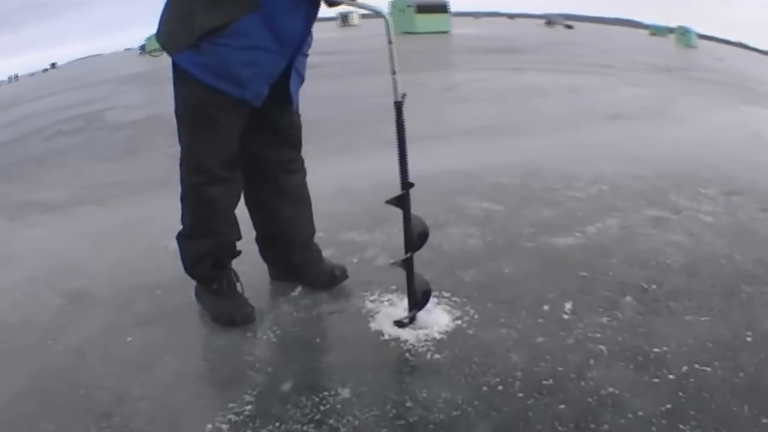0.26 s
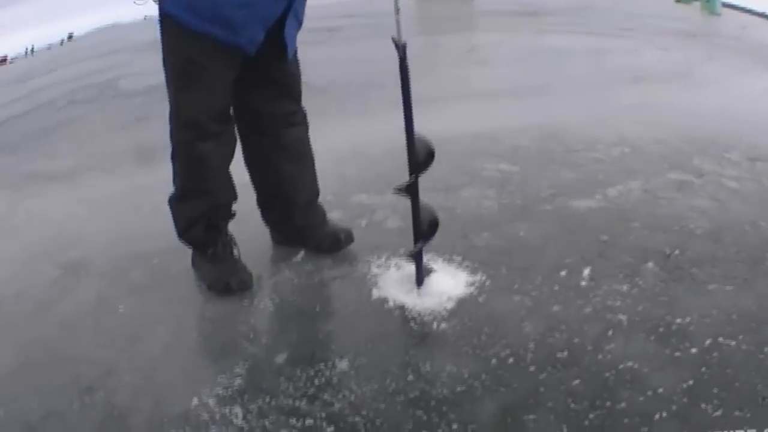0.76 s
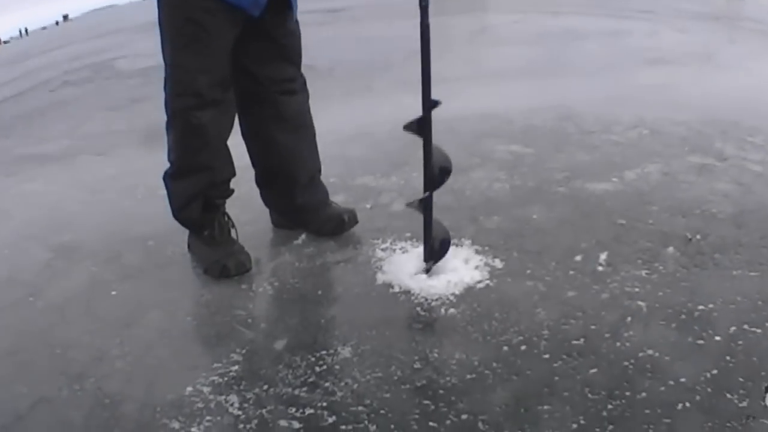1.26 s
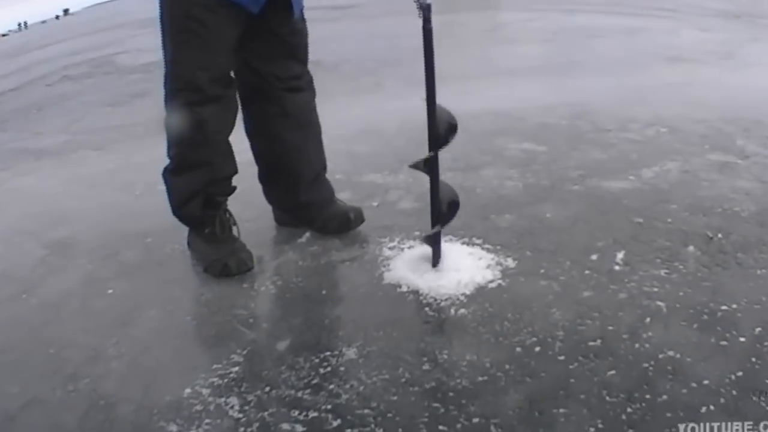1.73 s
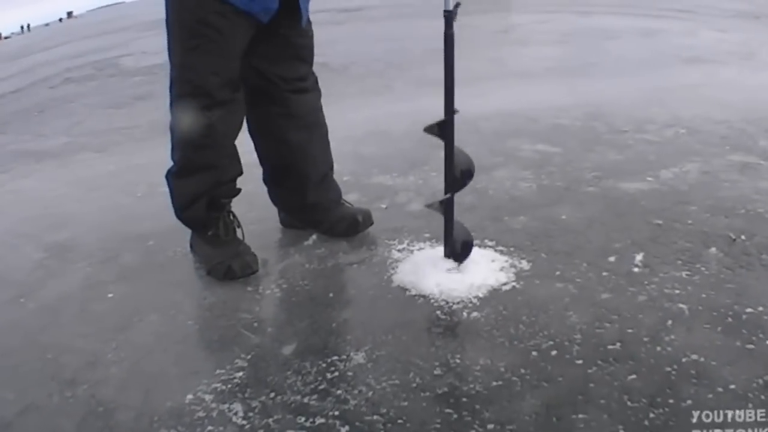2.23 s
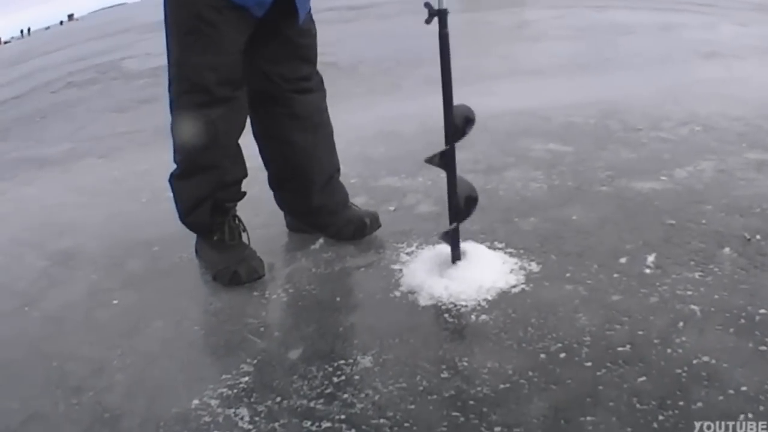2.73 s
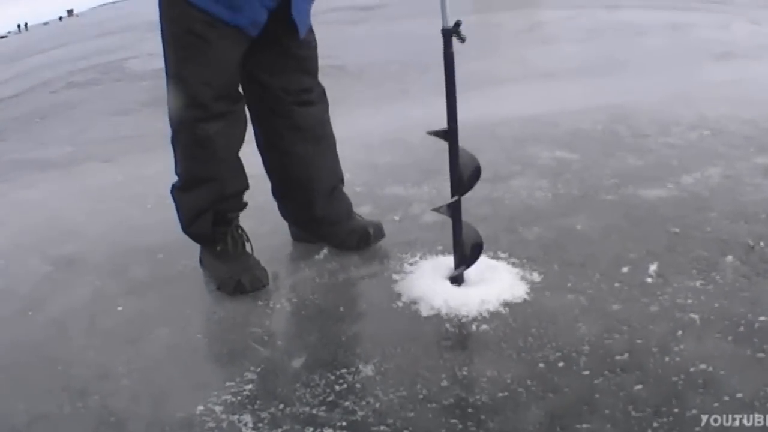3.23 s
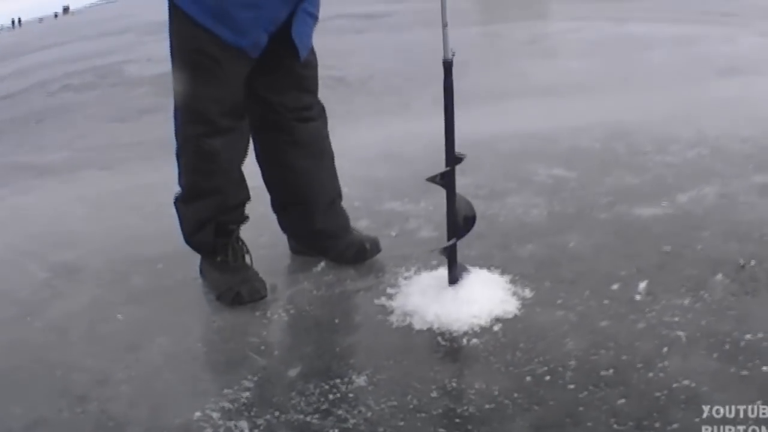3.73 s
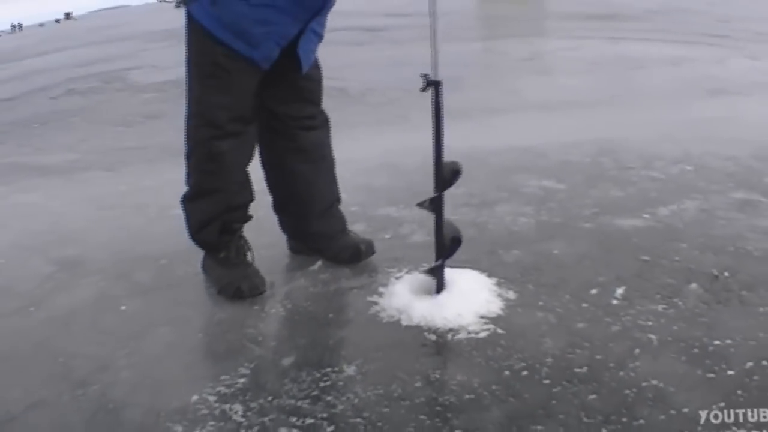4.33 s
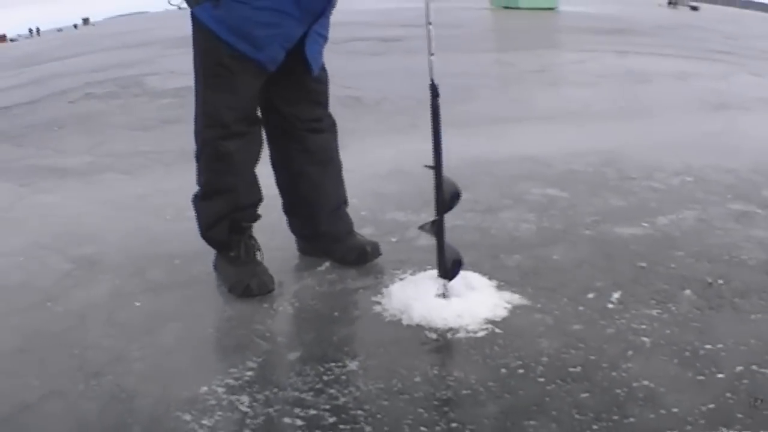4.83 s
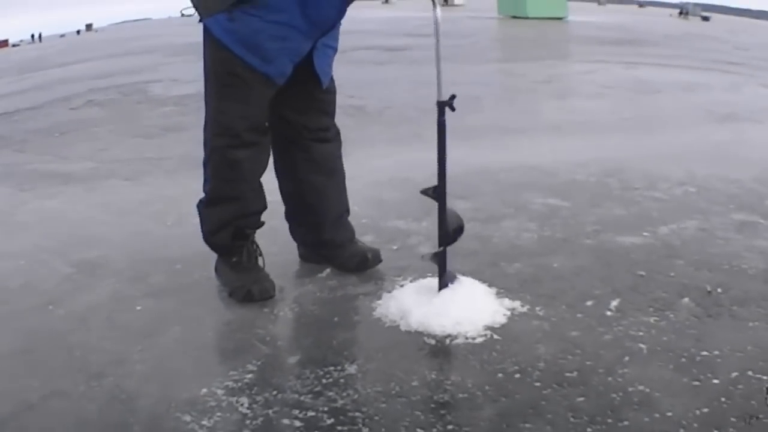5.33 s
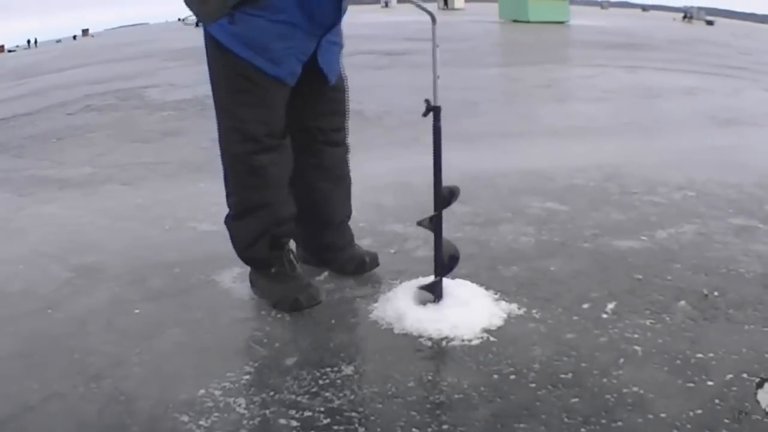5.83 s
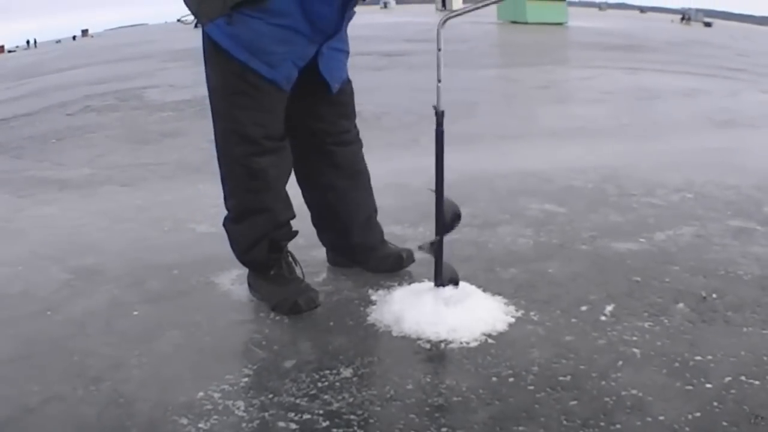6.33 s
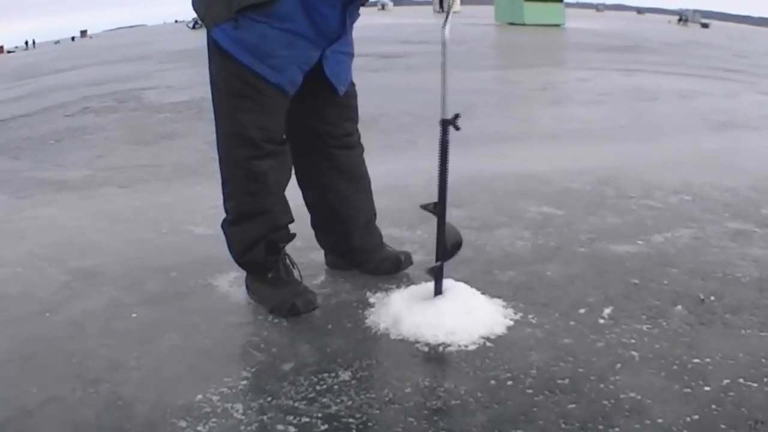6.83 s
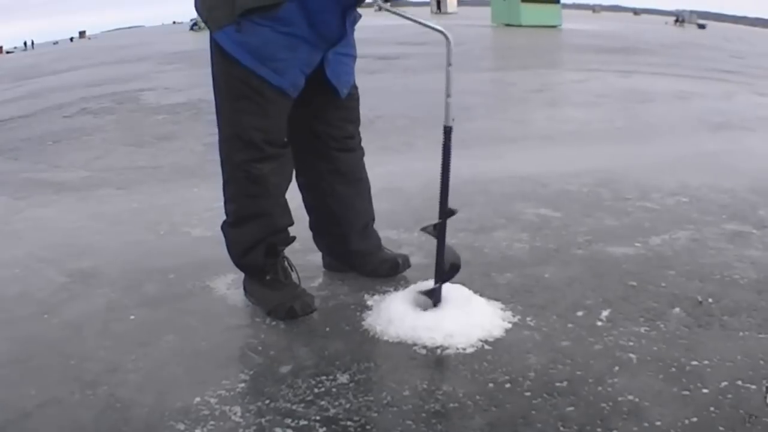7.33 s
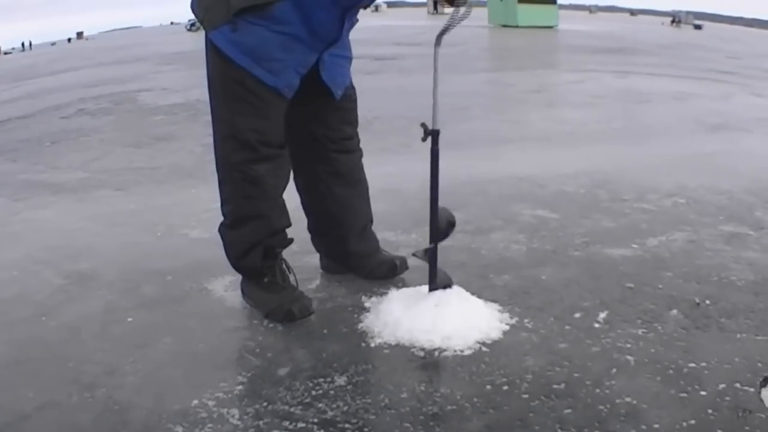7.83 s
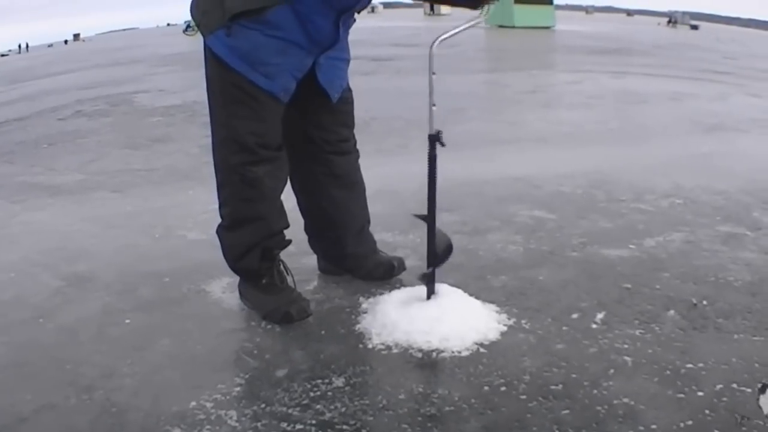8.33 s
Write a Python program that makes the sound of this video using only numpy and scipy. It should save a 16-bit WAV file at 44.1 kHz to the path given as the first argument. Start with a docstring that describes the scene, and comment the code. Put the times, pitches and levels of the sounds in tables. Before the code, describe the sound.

Continuous coarse ice grinding from a hand-turned drill, already under way at the start and unbroken to the end. Rapid stick-slip chatter, brief hesitations, harder bites and brittle clicks ride over hissing fine shavings. Hollow metallic resonances come and go, becoming lower and more muffled as loose chips bury the blades. A dull grind and very faint wind lie beneath. Dry open air, heard fairly close.

```python
"""An uneven grinding of ice and a soft puff of air are heard first: a hand auger is cranked into lake ice.
Its two blades chip by stick and slip, each slip a burst of tiny random fractures, with stalls, bites and ticks.
The chipping drives moving resonances of the steel spiral and the hole, in swells that follow the crank.
A dull grind of the ice sheet, two low knocks and faint wind on the microphones lie beneath."""
import sys
import numpy as np
from scipy import signal
from scipy.fft import rfft, irfft, next_fast_len
from scipy.io import wavfile
from scipy.ndimage import uniform_filter1d, map_coordinates

SR = 44100
rng = np.random.default_rng(int(sys.argv[2]) if len(sys.argv) > 2 else 0)


def master(y):
    """Save y as 16-bit WAV."""
    cut = np.clip(np.atleast_2d(y).T, -1, 1)
    pcm = np.round(cut * 32767)  # scale
    wavfile.write(sys.argv[1], SR, pcm.astype(np.int16))


N = 378020

# All half lengths are those of a Gaussian bump, from its centre to 1/e of its height.
# moments at which the crank passes its dead point, on the whole ever closer together: time [s]
DEAD_POINTS = [-.2, .72, 1.6, 2.49, 3.3, 4.08, 4.8, 5.51, 6.25, 6.97, 7.66, 8.33, 9]
# how closely loose chips and the wall of the hole enclose the blades: (time [s], share [0 open, 1 buried])
BURIAL = [(0, 0.42), (1.8, 0.079), (3.2, 0.012), (3.8, 0.23), (4.4, .75), (8.57, 0.94)]
# the blades hang for a moment: (time [s], half length [s], level [dB])
STALLS = [(0.038, 0.018, -4.5), (0.135, 0.019, -3), (.29, 0.042, -1.5), (.377, 0.0037, -6),
          (.6, 0.037, -3.5), (.777, 0.011, -3.5), (1.164, 0.0041, -7), (1.595, 0.076, -3),
          (1.594, 0.0042, -6), (1.781, .005, -8), (1.93, .008, -4.5), (2.033, 0.016, -11.5),
          (2.08, 0.016, -2.5), (2.096, 0.0055, -7), (2.147, 0.014, -3), (2.29, 0.037, -3),
          (2.489, 0.015, -8), (2.56, .016, -5.5), (2.68, .006, -3.5), (2.89, 0.032, -1.5),
          (3.27, 0.023, -2.5), (3.343, 0.0051, -12.5), (3.53, 0.035, -2), (3.558, 0.0089, -3),
          (3.69, 0.033, -1), (3.748, 0.012, -3.5), (3.761, 0.005, -7), (3.97, 0.031, -1),
          (4.248, 0.024, -3), (4.35, 0.0072, -5), (4.797, 0.027, -5), (4.98, 0.027, -2.5),
          (5.508, 0.023, -3.5), (5.556, .006, -4), (6.239, 0.0034, -9.5), (6.25, 0.0038, -11),
          (6.643, 0.029, -4), (6.957, 0.024, -7.5), (6.973, 0.0094, -20), (7.005, 0.026, -8),
          (7.115, 0.019, -2), (7.365, 0.012, -6.5), (7.625, 0.015, -3.5), (8.095, 0.03, -4.5),
          (8.318, 0.011, -4.5), (8.345, 0.023, -2), (8.365, 0.0041, -8), (8.513, 0.013, -4.5)]
# the blades dig in harder: (time [s], level [dB])
SURGES = [(.1, 2), (.24, 4.5), (.89, 1), (1.38, 2), (1.88, 3), (2.26, 2.5), (2.39, 1.5), (3.11, 1),
          (3.37, 2), (3.44, 2), (3.63, 4), (4.005, 1.5), (4.735, 2), (5.3, 1.5), (6.86, 2.5), (7.055, 2.5),
          (7.27, 1.5), (7.49, 1.5), (7.555, 1.5), (8.175, 3.5)]
# the slips stand more clearly apart: (time [s], half length [s], added share of bursts [1])
JUDDERS = [(.13, 0.13, 0.23), (1.238, 0.11, 0.41), (2.045, 0.15, 0.36), (2.67, 0.076, 0.22),
           (4.12, .11, 0.31), (4.86, 0.046, 0.17), (5.08, 0.052, .25), (5.55, 0.077, 0.41),
           (7.68, 0.037, 0.53), (8.33, 0.077, 0.2)]

# Drives have a first row for open blades and a second for buried ones:
# (mean level [dB], crank swing [dB], its peak [turns past the dead point], blade swing [dB], its peak [turns])
SCRAPE_DRIVE = [(-23, 1, 0.91, 0.5, 0.31), (-23.5, 0.94, 0.49, -0.06, 0.44)]
FIZZ_DRIVE = [(-27, 0.5, 0.89, 0.43, 0.32), (-27, 0.55, 0.62, 0.4, 0.34)]
# the same columns, one row for each resonance, with the blades open and then buried
RINGS_OPEN = [(-40.5, 0.99, 0.93, 1.5, 0.29), (-42.5, 1.8, 0.77, 2.9, 0.2), (-38.5, 2.5, 0.42, 2.9, 0.23),
              (-44.5, 1.2, 0.9, 0.3, 1), (-25, 0.75, 0.44, 3.3, 0.21), (-28.5, 2.7, 0.13, 0.95, 0.34),
              (-32, 1.2, 0.63, 1.7, 0.5), (-34, 1, 0.67, 1, 0.3), (-32, 1, 0.8, 1, 0.3),
              (-44, 1, 0.8, 1, 0.3)]
RINGS_BURIED = [(-29, 3.1, 0.74, 1.2, 0.3), (-31.5, 4.3, 0.38, 1.7, 0.41), (-31, .5, 0.8, 1.3, 0.17),
                (-30.5, 0.39, 1, 3.4, 0.25), (-36.5, 0.99, 0.27, 1.4, 0.34), (-22.5, 1.3, 0.28, 1.2, 0.48),
                (-36, 3.4, 0.41, 1, 0.05), (-44, 1, 0.4, 1, 0.3), (-30, 1, 1, 1, 0.3),
                (-46, 1, 0.8, 1, 0.3)]

# relative spectra of the scrape, the fizz of shavings and the dull grind: (frequency [Hz], level [dB])
SCRAPE_SPECTRUM = [(450, -47), (700, -15.5), (1150, -5.5), (1500, -2.5), (2300, -7), (2550, -3),
                   (3000, -3.5), (3600, -2.5), (4100, -5), (5200, -7.5), (6000, -7), (7500, -20),
                   (11000, -46)]
FIZZ_SPECTRUM = [(4000, -45), (6000, -11.5), (6800, -5), (7900, -3), (9500, -3.5), (11000, -6.5),
                 (12500, -9), (14000, -15), (15000, -26), (15600, -38)]
DULL_SPECTRUM = [(50, -60), (90, -33), (115, -28), (140, -7.5), (190, -5), (240, 1.5), (370, 0), (450, 9.5),
                 (600, 10), (750, 16.5), (1100, -51)]
# relative spectra of ticks, wind and jolts, and low cut of the auger's sound: (frequency [Hz], level [dB])
TICK_SPECTRUM = [(150, -50), (600, -23), (1400, 2), (4000, 11), (9000, -3), (15000, -13)]
WIND_SPECTRUM = [(15, -8), (30, -2), (80, 0), (200, -26)]
JOLT_SPECTRUM = [(20, -3), (70, 0), (200, -20), (600, -60)]
LOW_CUT = [(45, -28), (100, -0.5)]

# resonances of spiral and hole: (frequency [Hz], nominal width [Hz], relative level [dB], share of the bend [1])
RINGS = [(796.4, 112, -0.36, 0.17), (939, 101, -0.95, 0.53), (1087, 200, -2.5, 0.27),
         (1410, 118, 5.5, 0.96), (1737, 98, -4.5, 0.066), (1987, 266, -4.5, 0.17), (2984, 70, -5.5, 0.39),
         (1590, 100, -2, 0.2), (3430, 140, -13, 0.2), (4350, 130, -21, 0.2)]
# the turning spiral bends the resonances, by this path of the strongest: (time [s], frequency [Hz])
BEND = [(0, 1367), (.6, 1423), (1.0, 1305), (1.2, 1396), (1.45, 1464), (2.15, 1410), (2.42, 1467),
        (3.2, 1443), (4.1, 1425), (4.55, 1450), (5.25, 1427), (6.5, 1425), (6.85, 1387), (7.5, 1440),
        (7.7, 1350), (7.95, 1450), (8.25, 1380), (8.57, 1340)]
# the nearest resonance sings out or falls back: (time [s], half length [s], frequency near it [Hz], level [dB])
SINGS = [(0.112, 0.13, 1420, 11.5), (0.28, 0.11, 2970, 8.5), (.33, .1, 4350, 10), (.28, 0.1, 960, 3.5),
         (.54, 0.16, 1730, 5), (.93, .08, 1730, 0), (1.14, 0.13, 2970, 8), (1.123, 0.17, 1420, 11.5),
         (1.352, 0.16, 1420, 12), (1.2, 0.14, 1730, 2), (1.393, 0.051, 960, 11), (1.798, 0.13, 1730, 4.5),
         (1.853, 0.19, 960, 17), (1.79, .1, 1090, 8), (1.88, .06, 2970, 8), (2.24, .06, 1730, 3.5),
         (2.28, .18, 4350, 8), (2.33, .1, 1590, 9), (2.36, 0.32, 1420, 12), (2.367, 0.069, 960, 14),
         (2.785, 0.22, 960, 17.5), (2.697, .16, 1090, 7), (2.684, 0.064, 1730, 3.5),
         (2.854, 0.052, 1730, -12), (2.95, .2, 4350, 8), (3.042, 0.15, 1730, 7.5), (3.16, 0.27, 1420, 14),
         (3.15, .08, 3430, 20), (3.18, 0.12, 790, 9.5), (3.427, 0.082, 790, 7), (3.62, 0.082, 790, 10),
         (3.58, 0.12, 960, 10), (3.542, 0.29, 1090, 9.5), (3.89, 0.13, 1730, 10), (3.95, 0.13, 790, 8.5),
         (4.08, 0.14, 1420, 9), (4.35, .13, 1590, 13), (4.4, 0.31, 790, 4), (4.435, 0.24, 960, 7),
         (4.506, 0.035, 1420, 10), (4.704, 0.083, 1420, -5), (4.755, 0.15, 2015, 2), (4.9, 0.05, 1420, 3),
         (5.09, .07, 2015, 5), (5.27, 0.21, 960, 5), (5.357, 0.1, 1420, 3.5), (5.374, .08, 790, 4),
         (5.677, 0.047, 1420, 3), (5.826, 0.18, 2015, 3.5), (6.165, 0.083, 1420, 7), (6.16, 0.11, 790, 2.5),
         (6.15, 0.097, 960, 4), (6.32, .15, 3430, -10), (6.483, 0.18, 1420, 6.5), (6.422, 0.17, 2015, 2),
         (6.522, 0.088, 960, 3), (6.85, .07, 960, 0), (7.26, 0.048, 2015, 5.5), (7.27, 0.063, 2970, 7),
         (7.6, 0.11, 1420, 6.5), (7.55, 0.053, 3430, 14), (7.79, .08, 790, -7), (7.96, 0.073, 1420, 10),
         (8.484, 0.091, 1420, -2)]
# the ringing is kept thin below its lowest resonance: (frequency [Hz], level [dB])
RING_LOW_CUT = [(200, -18), (560, -8), (700, -2.5)]
# the ice sheet's dull share of the grinding: (time [s], level [dB])
SHEET = [(0, -33.5), (.22, -45), (.27, -45), (1.15, -40.5), (1.6, -43), (3.0, -43), (4.0, -41),
         (6.15, -40.5), (6.6, -43), (7.5, -41.5), (8.57, -38)]
# stronger or weaker puffs of air: (time [s], half length [s], level [dB])
GUSTS = [(.03, .15, 24), (1.1, .22, -15), (4.07, 0.1, 29), (7.68, .1, 14)]

# larger chips break off: (time [s], relative level [dB], ring against that level [dB], extra treble [dB])
BITES = [(0.098, 3, -1, -8), (0.19, 2.5, 9.5, 0), (0.2, 1, 6, -4), (0.229, -2, 7, -3),
         (0.251, 4, -11, -2.5), (.748, 6, -2, -2), (.998, -15, -12, -8), (1.184, -6, 10, 2),
         (1.208, -5, 0, 2), (1.221, -4, -6, 7), (1.282, 0, 0, -5), (1.309, -2, 0, -7), (1.494, 6, -16, -1),
         (1.756, 2, 4, 7), (1.999, -2, 6, -3), (2.07, -1, 2, -6), (2.087, 0, -8, 2), (2.102, 3, 1, -3),
         (2.5, -1, -9, 0), (2.539, -1, -5, 5), (2.644, 5, -3, -2), (2.657, 0, -9, 0), (2.922, 4, -23, -3),
         (3.347, 1, 5, -7), (3.664, 3, 0, 3), (4.025, -4, 13, 2), (4.056, 2, -3, 4), (4.074, -10, -3, 0),
         (4.105, -8, 7.5, -3), (4.176, -3, 7, 6), (4.393, 2.5, 9, 3.5), (4.518, 0, 9, -2),
         (4.735, -2, -6, 2), (4.82, 5, 1, -1), (4.833, 0, 3, -3), (4.849, 0, 5, -14), (5.03, -10, 11, -3),
         (5.093, 2.5, 7, 0), (5.458, -0.5, -9, 6.5), (5.572, 4, -6, 1), (5.795, -1.5, 14, -3),
         (6.271, 0, 8, 1), (6.376, -4.5, 13, 4), (6.447, 1, -3, 0), (6.874, -2.5, 16, 0),
         (6.9805, 4.5, -3, 3.5), (7.639, 4, 1, -3), (7.658, 2, 3, -6), (7.685, -4.5, 17, -2),
         (7.737, -0.5, 11.5, 1), (7.844, 0, 8, -2), (8.032, 4, 3, 1), (8.057, 5.5, -8, 1),
         (8.385, 2.5, 13, 2), (8.398, 1, 7, -2)]
# how a big chip excites the resonances: (frequency [Hz], level [dB])
BITE_TONE = [(200, -22), (560, -8), (790, -4), (1400, -3), (3000, -10)]
# dull knocks: (time [s], relative level [dB])
KNOCKS = [(0.176, -27), (3.234, -43)]

# likeness of left and right ahead of the spiral's reflections: (frequency [Hz], correlation [1])
ALIKE = [(60, .3), (120, 0.71), (240, 0.77), (500, 0.9), (950, .96), (1900, 0.92), (3800, 0.61),
         (7500, 0.62), (15000, 0.61)]
# balance of left against right: (frequency [Hz], level difference [dB])
LEAN = [(60, -1), (92, 1.5), (140, 4), (210, 1.5), (330, 0), (500, 0.5), (770, 0.5), (1170, 1), (1790, 0),
        (2740, 1), (4190, -1), (6410, 1.5), (9810, 6), (15000, 4.5)]
# colour of steel and hole: (frequency [Hz], width [Hz], level when open [dB], level when buried [dB])
COLOUR = [(520, 140, 4, -8), (800, 112, -5, 1.5), (900, 140, -0.5, 2), (1036, 152, 3, -15),
          (1230, 120, -6.5, 4), (2232, 72, 7, 6.5), (2290, 220, 1.5, 0.5), (3430, 104, -4.5, 4),
          (3910, 190, -2.5, -3), (4350, 140, 4.5, -1), (5200, 61, 6, 5), (5950, 360, -2, -6.5),
          (6720, 84, 7.5, 3.5), (7170, 90, 5, 6)]
# long waves bend around the spiral, short ones bounce off it: (frequency [Hz], share of the reflections [1])
BOUNCE = [(700, 0.2), (2400, 0.89)]

SLIPS_PER_S, SLIPS_BURIED_PER_S = 83, -11  # mean slip rate with open blades; its change when buried
BURST_SHARE = 0.52  # usual share of the cutting power that comes in bursts
# just past the dead point [turns] slips come slower [share] and more distinct [added share of bursts]
LABOUR_TURNS, LABOUR_SLOWS, LABOUR_BURSTS = 0.0634, 0.1038, 0.013
SURGE_S = 0.02  # half length of a surge
HANG_S, HANG_DB = 0.005, -3.5  # quiet loading just before a big chip: half length and lead, depth
TICKS_PER_S, TICK_DB, TICK_SPREAD_DB = 36, -7.5, 9  # mean rate, loudest relative level, range below it
WIND_DB, GUST_DB = -87, 6  # level without puffs, strength of its random variation
TOP_HZ = 15650  # upper band limit


def amp(db):
    """Logarithmic level: decibels become a gain."""
    return 10 ** (np.asarray(db) / 20)


def unit(x):
    """Normalization: x is brought to an rms of 1."""
    return x / np.sqrt(np.mean(x ** 2) + 1e-20)


def along(points, hz):
    """Interpolation of (frequency, value) points on a logarithmic frequency axis."""
    f, v = np.transpose(points)
    return np.interp(np.log(hz + 1), np.log(f + 1), v)


def curves(rows):
    """Linear interpolation in time: one value per sample for each column after the time."""
    s, *cols = np.transpose(rows)
    return [np.interp(np.arange(N) / SR, s, c) for c in cols]


def wobble(rate):
    """Slow random modulation: a smooth curve through rate random knots a second."""
    return map_coordinates(rng.standard_normal(4096), [np.arange(N) * rate / SR], mode="wrap")


def spells(rows):
    """Superposition of Gaussian bumps, one for each (time, half length, height)."""
    total = np.zeros(N)
    for s, half, height in rows:
        start, end = max(int((s - 4 * half) * SR), 0), min(int((s + 4 * half) * SR), N)
        i = np.arange(start, end)
        total[i] += height * np.exp(-np.square((i / SR - s) / half))
    return total


def filtered(x, response):
    """Linear filtering: the spectrum of x times a response of frequency."""
    m = next_fast_len(N + SR // 4, True)
    return irfft(rfft(x, m) * response(np.fft.rfftfreq(m, 1 / SR)), m)[..., :N]


def shaped(x, spectrum):
    """Spectral weighting: x coloured by (frequency, level) points."""
    return filtered(x, lambda f: amp(along(spectrum, f)))


def mode(f, hz, width):
    """Damped resonance: the causal response of a single mode."""
    return 1j * f * width / (hz * hz - f * f + 1j * f * width)


def gliding(x, hz, width):
    """Heterodyne resonance: shifting x by a moving carrier lets a double pole follow the centre."""
    carrier = np.exp(2j * np.pi * np.cumsum(hz) / SR)
    pole = np.exp(-np.pi * width / SR)
    return (signal.lfilter([1], np.poly([pole, pole]), x / carrier) * carrier).real


def steadied(ring):
    """Energy levelling: slow changes of power are evened out by the mid signal, fast flutter stays."""
    power = np.abs(uniform_filter1d(ring[0] ** 2, size=3500))
    return ring / np.sqrt(power + 1e-20)


def fractures(per_second, spread_db):
    """Brittle fracture as random impulses of unequal size, in a mid and a side signal."""
    present = rng.random(N) < per_second / SR
    size = amp(spread_db * rng.standard_normal(N))
    return unit(rng.standard_normal((2, N)) * present * size)


def burst(rise, decay):
    """Impulsive release: an envelope that rises fast to 1 and decays exponentially (both in s)."""
    t = np.arange(SR // 6) / SR
    shape = (1 - np.exp(-t / rise)) * np.exp(-t / decay)
    return shape / shape.max()


def strikes(times, sizes, shape):
    """Superposition of impulses: one scaled copy of an envelope at each time."""
    at = np.clip(np.round(times * SR).astype(int), 0, N)
    marks = np.bincount(at, sizes, N + 1)[:N]
    return np.abs(signal.fftconvolve(marks, shape)[:N])


def crank():
    """Rotation and burial: turns of the crank so far, and how closely the blades are enclosed."""
    turn = np.interp(np.arange(N) / SR, DEAD_POINTS, np.arange(len(DEAD_POINTS)))
    return turn, np.clip(curves(BURIAL)[0], 0, 1)


def swell(drive):
    """Periodic forcing: gain swings once a turn for the crank and twice for the two blades."""
    turn, buried = crank()
    levels = []
    for db, crank_db, crank_at, blade_db, blade_at in drive:
        crank_swing = crank_db * np.cos(2 * np.pi * (turn - crank_at))
        blade_swing = blade_db * np.cos(2 * np.pi * 2 * (turn - blade_at))
        levels.append(db + crank_swing + blade_swing)
    open_db, buried_db = levels
    return amp(open_db + (buried_db - open_db) * buried)


def grip_db():
    """Friction grip: the blades hold less in a stall or just before a big chip, more in a surge."""
    hangs = [(s - HANG_S, HANG_S, HANG_DB) for s, *_ in BITES]
    surges = [(s, SURGE_S, db) for s, db in SURGES]
    return spells(STALLS + hangs + surges)


def slipping(scatter, size_db, slip_decay, uneven_db, push_db):
    """Stick and slip: the blades load up, slip and load again, giving the strength of the chipping."""
    turn, buried = crank()
    labour = np.cos(2 * np.pi * (turn - LABOUR_TURNS))
    rate = (SLIPS_PER_S + SLIPS_BURIED_PER_S * buried) * (1 - LABOUR_SLOWS * labour)
    share = np.clip(BURST_SHARE + LABOUR_BURSTS * labour + spells(JUDDERS), 0, .95)
    slips = np.flatnonzero(np.diff(np.floor(np.cumsum(rate) / SR)))
    chance = rng.standard_normal((2048, 2))[:len(slips)]
    times = slips / SR + scatter * chance[:, 0] / rate[slips]
    power = strikes(times, amp(size_db * chance[:, 1]) ** 2, burst(.0006, slip_decay))
    # the crank supplies the energy, the slips only bunch it
    power /= uniform_filter1d(power, size=4410) + 1e-9
    level_db = grip_db() + uneven_db * wobble(45) + push_db * wobble(14)
    return np.sqrt(1 - share + share * power) * amp(level_db)


def shaving(slips):
    """Fracture noise: the bright scrape of the blades and the fizz of fine shavings."""
    scrape_flutter = amp(1.03 * wobble(25))
    scrape = unit(shaped(fractures(30000, spread_db=1.3) * slips * scrape_flutter, SCRAPE_SPECTRUM))
    fizz_flutter = amp(0.61 * wobble(110) + 0.98 * wobble(6.1))
    fizz = unit(shaped(fractures(24000, spread_db=1.0) * slips * fizz_flutter, FIZZ_SPECTRUM))
    return swell(SCRAPE_DRIVE) * scrape + swell(FIZZ_DRIVE) * fizz


def grinding(slips):
    """Sheet radiation: the ice sheet answers the chipping with a dull grind."""
    cracks = fractures(9000, spread_db=1.5) * slips
    return amp(curves(SHEET)[0]) * unit(shaped(cracks, DULL_SPECTRUM))


def ringing(slips, broaden, waver_db, touchy):
    """Forced resonance: the chipping drives each mode of spiral and hole, which weakens with the grip."""
    bend = curves(BEND)[0] / RINGS[3][0] - 1  # the fourth resonance is the strongest
    drive = slips * amp(touchy * grip_db())
    grip = unit(np.sqrt(np.abs(uniform_filter1d(drive ** 2, size=3500))))
    centres = np.transpose(RINGS)[0]
    rings = np.zeros((2, N))
    for k, (hz, width, db, follows) in enumerate(RINGS):
        own_sings = [(s, half, gain) for s, half, near, gain in SINGS
                     if np.argmin(abs(centres - near)) == k]
        cracks = fractures(9000, spread_db=3.0) * drive
        ring = steadied(gliding(cracks, hz * (1 + follows * bend), broaden * width)) * grip
        level = amp(db + spells(own_sings) + waver_db * wobble(17))
        rings += swell([RINGS_OPEN[k], RINGS_BURIED[k]]) * level * ring
    return shaped(rings, RING_LOW_CUT)


def ticking(slips):
    """Random impulses: brittle splinters click off, louder as the slip is stronger, up to a limit."""
    present = rng.random(N) < TICKS_PER_S / SR
    size = amp(TICK_DB - TICK_SPREAD_DB * rng.random(N)) * np.minimum(slips, 1)
    clicks = np.sign(rng.standard_normal((2, N))) * present * size
    return shaped(clicks, TICK_SPECTRUM)


def wind():
    """Turbulent pressure: soft lumps of low-frequency noise, independent at each microphone port."""
    lumps = rng.standard_normal((2, N)) * amp(GUST_DB * wobble(13))
    return amp(WIND_DB + spells(GUSTS)) * unit(shaped(lumps, WIND_SPECTRUM))


def biting(crack_db, fizz_db, ring_db, decay, snap_decay):
    """Impulse excitation: a big chip snaps off, crunches and rings the spiral."""
    s, db, rel_db, treble_db = np.transpose(BITES)
    shape = burst(0.00046, decay)
    snap_sizes = amp(db + treble_db + fizz_db)
    snap = rng.standard_normal((2, N)) * strikes(s, snap_sizes, burst(0.0002, snap_decay))
    crack = rng.standard_normal((2, N)) * strikes(s, amp(db + crack_db), shape)
    push = rng.standard_normal((2, N)) * strikes(s, amp(db + rel_db + ring_db), shape)

    def body(f):
        """Modal sum: the resonances at rest, each twice its nominal width and squared."""
        return sum(amp(level) * mode(f, hz, 2 * width) ** 2 for hz, width, level, _ in RINGS)

    ring = shaped(filtered(push, body), BITE_TONE)
    return shaped(snap, FIZZ_SPECTRUM) + shaped(crack, SCRAPE_SPECTRUM) + ring


def thudding(level_db, decay):
    """Low-frequency recoil: each big chip also jolts the ice sheet, very faintly."""
    s, db, *_ = np.transpose(BITES)
    jolt = rng.standard_normal((2, N)) * strikes(s, amp(db + level_db), burst(.003, decay))
    return shaped(jolt, JOLT_SPECTRUM)


def knocking(level_db, hz, width):
    """Damped impact: the crank knocks dully as the load on it shifts."""
    s, db = np.transpose(KNOCKS)
    push = rng.standard_normal((2, N)) * strikes(s, amp(db + level_db), burst(0.0039, 0.023))
    return filtered(push, lambda f: mode(f, hz, width) ** 4)


def microphones(pair):
    """Interchannel coherence: mid and side become left and right, most alike in the middle range."""
    def widen(f):
        """Mid-side rotation: the side gain that gives the wanted correlation."""
        angle = np.arccos(np.clip(along(ALIKE, f), -1, 1)) / 2
        return np.array([np.ones_like(f), np.tan(angle)])

    def lean(f):
        """Level difference: opposite half shares to left and right, their mean gain held at 1."""
        gains = amp(np.outer([.5, -.5], along(LEAN, f)))
        return gains / gains.mean(0)

    mid, side = filtered(pair, widen)
    return filtered(np.array([mid + side, mid - side]), lean)


def turning(pair, shared_db, own_db):
    """Cavity colour and reflection: burial recolours the hole, the spiral lifts and dips random bands."""
    hz, t, z = signal.stft(pair, SR, nperseg=1024)
    buried = np.interp(t, *np.transpose(BURIAL))
    colour_db = 0
    for centre, width, shallow, deep in COLOUR:
        peak = 1 / (1 + (2 * (hz - centre) / width) ** 2)
        colour_db = colour_db + np.outer(peak, shallow + (deep - shallow) * buried)
    # one random field shared by the ports and one for each, smoothed over frequency and time
    field = uniform_filter1d(rng.standard_normal((3, len(hz), len(t))), size=3, axis=1)
    field = unit(uniform_filter1d(uniform_filter1d(field, size=13, axis=2), size=7, axis=2))
    glint_db = (shared_db * field[0] + own_db * field[1:]) * along(BOUNCE, hz)[:, None]
    return signal.istft(z * amp(colour_db + glint_db), SR, nperseg=1024)[1][:, :N]


def scene():
    """Free-field superposition: there is no echo, and the deep bass of the auger is cut."""
    slips = slipping(scatter=0.11, size_db=1.5, slip_decay=0.0066, uneven_db=0.6, push_db=0.23)
    auger = shaving(slips) + grinding(slips) + ticking(slips)
    auger = auger + ringing(slips, broaden=1.19, waver_db=0.5, touchy=0.13)
    auger = auger + biting(crack_db=-9.0, fizz_db=-13.5, ring_db=-6.5, decay=0.0031, snap_decay=0.0029)
    auger = shaped(auger + knocking(level_db=14, hz=450, width=700), LOW_CUT)
    heard = microphones(auger + thudding(level_db=-53, decay=.025))
    return turning(heard, shared_db=1.7, own_db=2.44) + wind()


def record(dry):
    """Band limitation: nothing at or above the upper limit is kept."""
    return filtered(dry, lambda hz: hz < TOP_HZ)


dry = scene()
out = record(dry)
master(out)
```